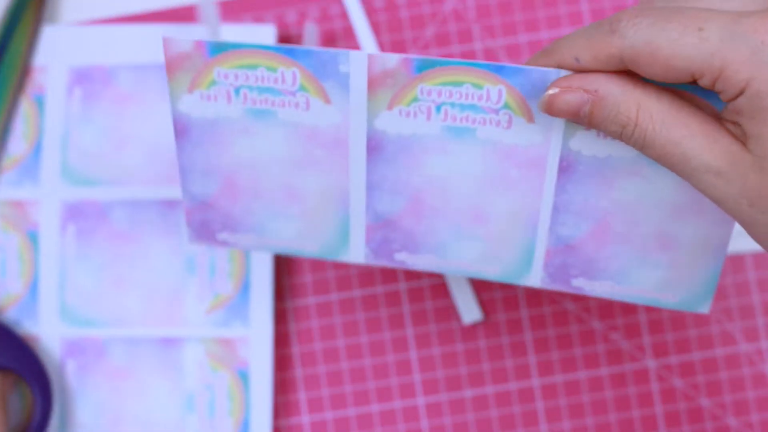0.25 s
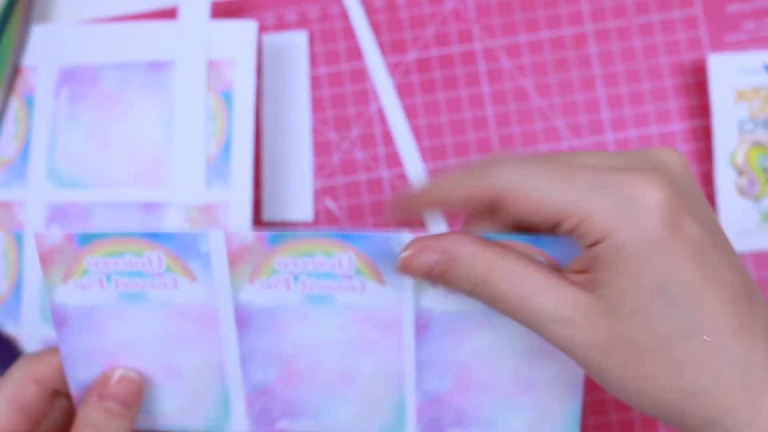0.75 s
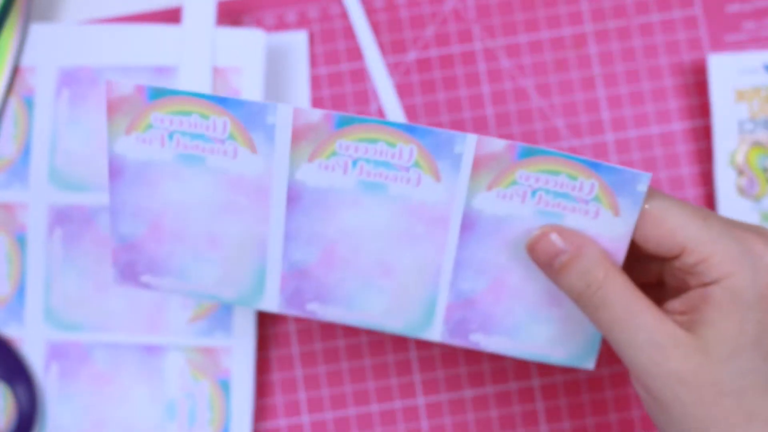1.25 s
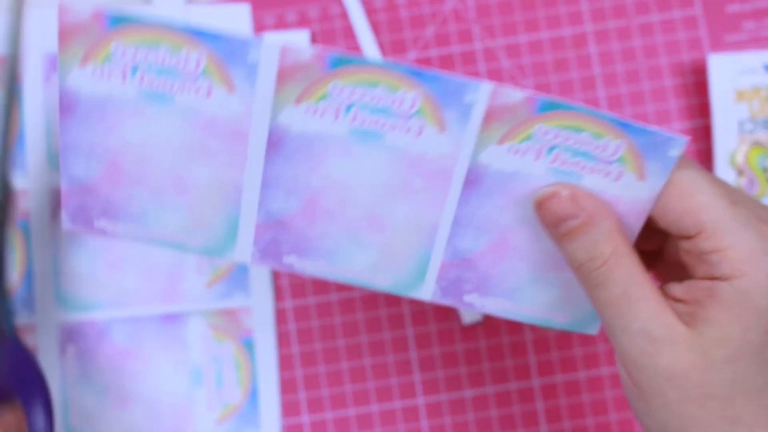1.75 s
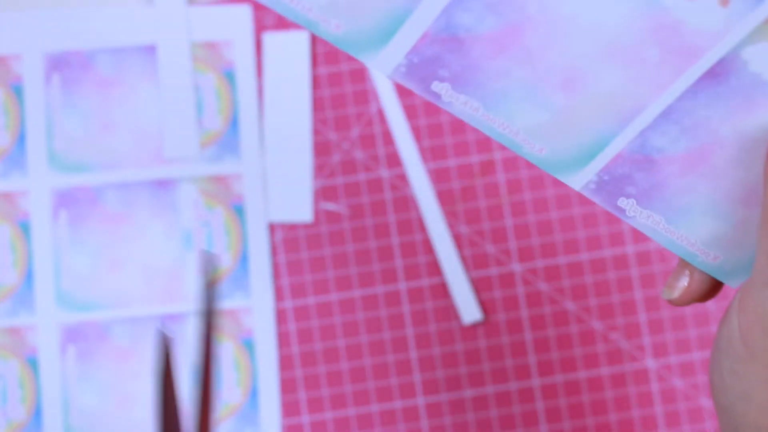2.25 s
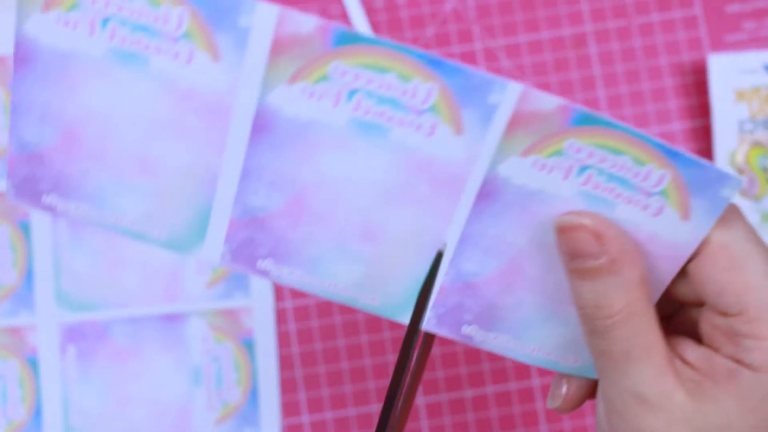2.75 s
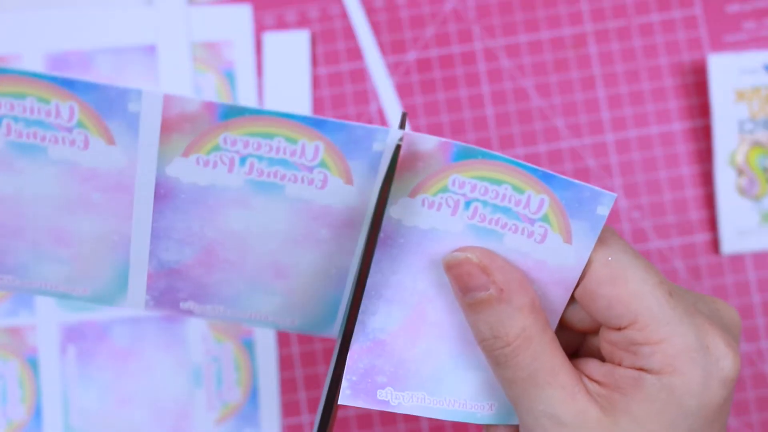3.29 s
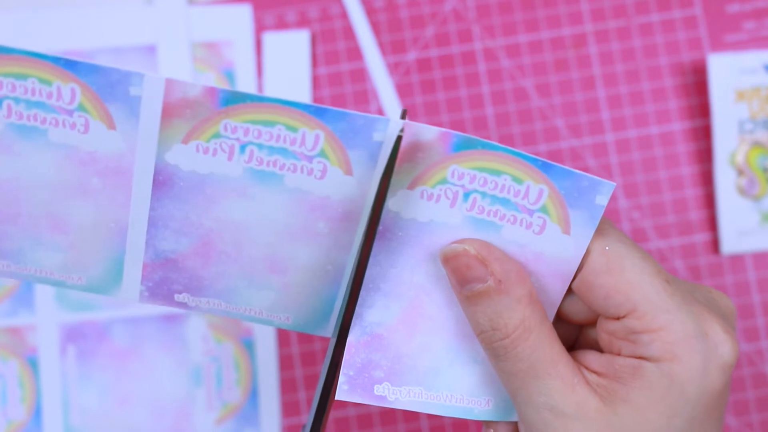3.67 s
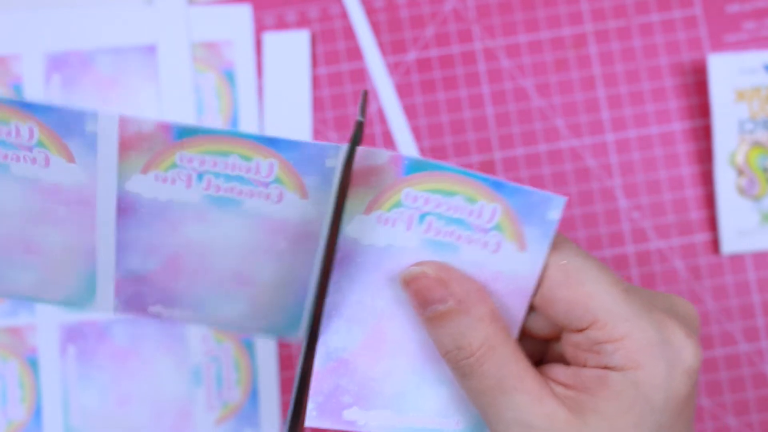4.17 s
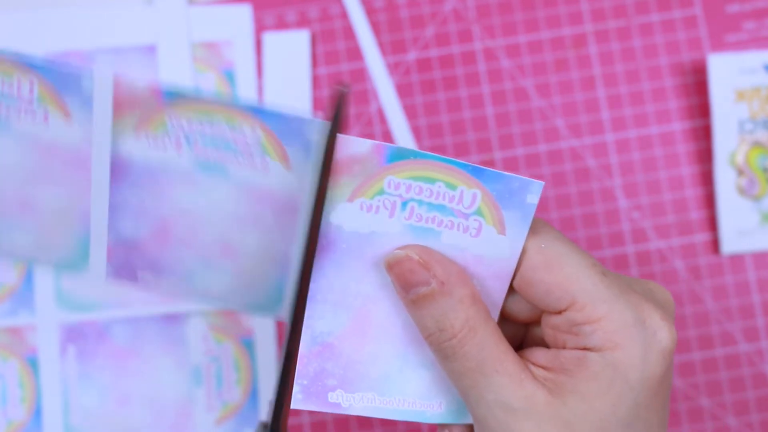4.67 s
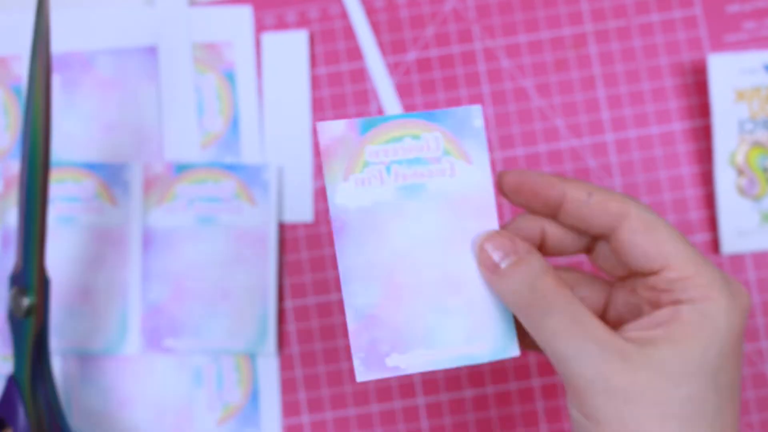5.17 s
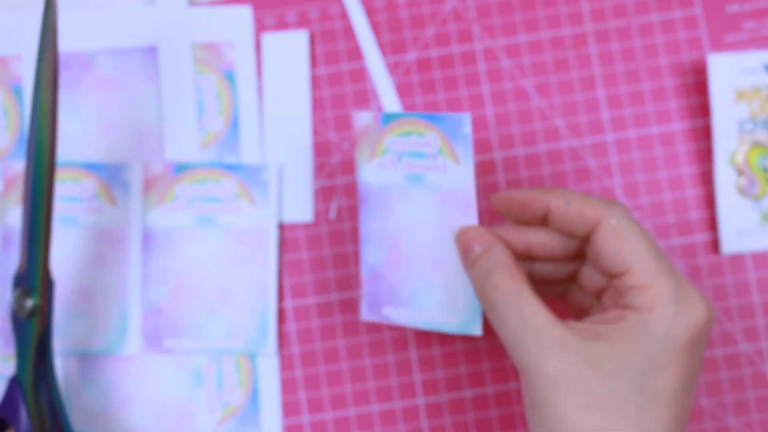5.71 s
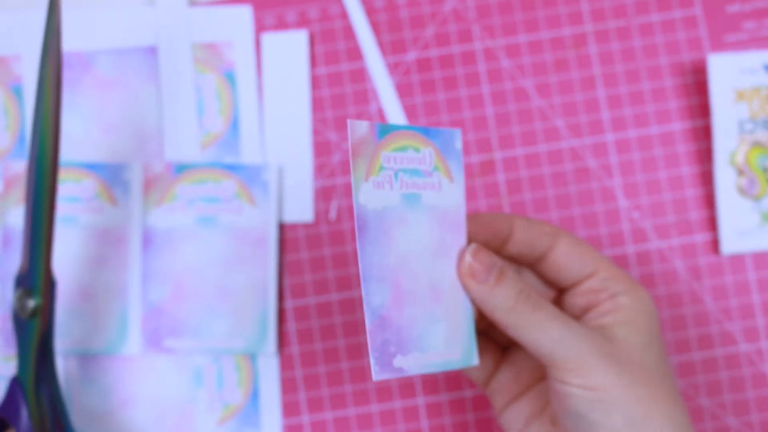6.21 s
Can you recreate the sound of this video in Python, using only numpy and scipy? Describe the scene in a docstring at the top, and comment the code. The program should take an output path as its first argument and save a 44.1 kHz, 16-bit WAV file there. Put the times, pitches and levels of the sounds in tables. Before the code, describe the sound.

Crisp irregular card flicks and dull knocks come first, thinning into small finger shifts. A thin metallic swish follows, then pivot ticks, stuttering blade scrapes and a short crackling cut. After a pause with tiny card rustles, more scraping and a second, slower creaky cut lead to a loud clacking snap. Handles settle on the table with a few taps, leaving only room hiss and faint rumble, closely miked and dry.

```python
"""A strip of printed card is slid and knocked about on a craft table, close by: filtered grains and rattles.
Scissors swish open and cut it in two pushes: catches of grains make the dry blades judder, and a stick-slip
sawtooth makes the card creak while puffs of grains crunch. The blades snap shut with decaying steel modes;
the scissors are laid down in taps of noise. A small room hisses, and a faint rumble sets in partway."""
import sys
import numpy as np
from scipy import signal
from scipy.fft import rfft, irfft
from scipy.io import wavfile

SR = 44100
rng = np.random.default_rng(int(sys.argv[2]) if len(sys.argv) > 2 else 0)


def store_wav(level_fs):
    """Save 16-bit WAV to argv[1]."""
    pcm = np.round(np.clip(np.atleast_2d(level_fs), -1, 1) * 32767)
    wavfile.write(sys.argv[1], SR, pcm.T.astype(np.int16))


N = 284445
TIME = np.arange(N) / SR

# Stiff card, broad colour. Each row: frequency in Hz, relative density in dB per Hz.
CARD_COLOUR = [(100, -14), (500, -15), (1050, 3.5), (2100, 1), (2800, 3.5), (3800, -3.5), (5800, -6),
               (7500, -18.5), (12000, -22), (15500, -50)]
# Stiff card, resonances. Each row: centre in Hz, width in Hz, height in dB on the colour's scale.
CARD_RESONANCES = [(1510, 190, 7.5), (2020, 160, 2.5)]


def from_db(db):
    """Amplitude factor of a level in dB."""
    return 10 ** (np.asarray(db) / 20)


def rms_one(x):
    """Scale to rms 1."""
    return x / np.sqrt(np.mean(x ** 2) + 1e-20)


def level(rows):
    """Gain over time from (s, dB) points; silent outside them."""
    return from_db(np.interp(TIME, *np.transpose(rows), left=-200, right=-200))


def add(track, s, sound):
    """Mix a short sound in at time s."""
    start = int(np.clip(round(s * SR), 0, N))
    track[start:start + len(sound)] += sound[:N - start]


def body(x, colour, peaks=(), size=8192):
    """Minimum-phase filter of unit energy: a broad colour plus resonances, falling away below the colour."""
    hz = np.maximum(np.arange(size // 2 + 1) * SR / size, 1)
    points = np.array(colour)
    colour_db = np.interp(np.log(hz), np.log(points[:, 0]), points[:, 1])
    power = from_db(colour_db) ** 2
    for centre, width, db in peaks:
        detuning = (hz ** 2 - centre ** 2) / (hz * width)
        power = power + from_db(db) ** 2 / (1 + detuning ** 2)
    power = power / (1 + (points[0, 0] / hz) ** 8) + 1e-10
    # folding the cepstrum makes the response causal
    cepstrum = irfft(np.log(power) / 2)
    cepstrum[1:size // 2] *= 2
    cepstrum[size // 2 + 1:] = 0
    response = irfft(np.exp(rfft(cepstrum)))
    return signal.oaconvolve(x, response / np.linalg.norm(response))[:N]


def drift(rate):
    """Slow chance: random knots of spread 1, rate per second, joined by lines."""
    knots = rng.standard_normal(N // 20)
    return np.interp(TIME * rate, np.arange(len(knots)), knots)


def grains(per_s, spread_db):
    """Random tiny slips of uneven size; rms 1."""
    size_db = spread_db * np.minimum(rng.exponential(1, N), 4)
    slips = from_db(size_db) * rng.choice([-1, 1], N)
    return rms_one(slips * (rng.random(N) < per_s / SR))


def contact(fade_s, size=8192):
    """A rattle of micro-contacts that dies away from rms 1."""
    envelope = np.exp(-TIME[:size] / max(fade_s, 1 / SR))
    rattle = rng.standard_normal(size) * envelope
    return rattle * np.linalg.norm(envelope) / np.linalg.norm(rattle)


def tail(x, t60, gap_s=0.0033):
    """Dense decaying reverberation of unit energy, swelling in over gap_s."""
    t = TIME[:SR // 2]
    envelope = np.exp(-np.log(1000) * t / t60) * (1 - np.exp(-t / gap_s))
    response = rng.standard_normal(len(t)) * envelope
    return signal.oaconvolve(x, response / np.linalg.norm(response))[:N]


def strokes(rows, column=2):
    """Gain over time of rubbing strokes, each with an attack, a hold and a release; powers add."""
    attack_s, release_s = 0.0088, 0.025
    power = np.zeros(N)
    for row in rows:
        t = TIME - row[0]
        attack = np.clip(t / attack_s, 0, 1)
        release = np.exp(-np.maximum(t - row[1], 0) / release_s)
        power += (from_db(row[column]) * attack * release) ** 2
    return np.sqrt(power)


def swell(top_s, hold_s, rise_db_per_s, fall_db_per_s):
    """Gain that climbs to 1 at top_s, holds and dies away."""
    before_s = np.maximum(top_s - TIME, 0)
    after_s = np.maximum(TIME - top_s - hold_s, 0)
    below_db = rise_db_per_s * before_s + fall_db_per_s * after_s
    return from_db(-np.minimum(below_db, 200))


def background(lumpy_db=3.0):
    """Steady filtered-noise hiss, a little of it opposite in the two ears, over a lumpy low rumble."""
    # Levels of hiss, rumble and side hiss. Each row: time in seconds, level in dB.
    hiss_levels = [(0, -46), (2.15, -48), (2.4, -46), (2.78, -47), (3.1, -49), (6.45, -50.5)]
    rumble_levels = [(2.81, -72), (2.84, -50.5), (5.42, -51.5), (5.5, -47), (6.45, -46)]
    side_levels = [(0, -68), (2.8, -61), (6.45, -59)]
    # Their broad colours. Each row: frequency in Hz, relative density in dB per Hz.
    hiss_colour = [(130, -2.5), (200, 1.5), (320, 3.5), (480, -2.5), (1000, -6.5), (1400, -6), (2000, -8.5),
                   (3400, -7), (5300, -6), (6400, -10.5), (8000, -16.5), (15500, -20)]
    rumble_colour = [(20, -1.5), (40, -4), (75, -3), (130, -10), (220, -18.5), (400, -42)]
    side_colour = [(35, -38), (60, -10), (159, 2.5), (1830, -5), (3190, -11.5), (3670, -10.5), (6560, -2),
                   (15500, -0.5)]
    hiss = level(hiss_levels) * body(rng.standard_normal(N), hiss_colour)
    lumps = from_db(lumpy_db * drift(rate=28))
    rumble = level(rumble_levels) * lumps * body(rng.standard_normal(N), rumble_colour)
    side = level(side_levels) * body(rng.standard_normal(N), side_colour)
    return hiss + rumble + side * np.array([[1], [-1]])


def card_sliding(hiss_db=-5, rub_db=-5.0, rasp_db=-8, rasp_width_hz=260, grit_db=-9.5, uneven_db=0.96):
    """Paper fibres brush past each other under an unsteady pressure; the card's edge catches and rasps."""
    # Strokes of card over card. Each row: start in seconds, time to release in seconds,
    # relative hiss in dB, relative dull rubbing in dB, nominal pitch of the edge's rasp in Hz.
    slides = [(0.0, 0.071, -29, -36, 4900), (0.077, 0.085, -29, -49, 3780), (0.169, 0.12, -34.5, -42, 5150),
              (0.253, 0.26, -35, -28.5, 3270), (0.35, 0.018, -24, -33, 4440),
              (0.58, 0.032, -41, -27.5, 4300), (0.788, 0.23, -45, -68, 5000),
              (0.986, 0.041, -39, -50, 4800), (1.281, 0.097, -45, -41.5, 3850),
              (1.487, 0.024, -26, -38, 3620), (1.508, 0.27, -35.5, -37.5, 3520),
              (1.567, 0.039, -27, -28.5, 4500), (1.797, 0.17, -44, -59, 5100)]
    # Broad colours. Each row: frequency in Hz, relative density in dB per Hz.
    hiss_colour = [(400, -30), (1500, -12.5), (2600, -3), (4200, -3), (6000, -1), (7400, -11), (9500, -16),
                   (12500, -19.5), (15500, -52)]
    rub_colour = [(60, -27), (170, -6), (330, -7.5), (700, -4), (1100, -5.5), (1550, 2), (2200, -4.5),
                  (4000, -46)]
    rasp_wander = 0.055   # log spread of the rasp's pitch

    pressure = from_db(uneven_db * drift(rate=120))
    speed = pressure * strokes(slides)
    hiss = from_db(hiss_db) * speed * grains(per_s=12000, spread_db=3.5)
    weight = pressure * strokes(slides, column=3)
    rub = from_db(rub_db) * weight * grains(per_s=1500, spread_db=4.0)
    # single catches ring the card
    grit = from_db(grit_db) * speed * grains(per_s=600, spread_db=1.5)

    low_pass = signal.butter(2, rasp_width_hz, fs=SR, output="sos")
    ringing = signal.sosfilt(low_pass, rng.standard_normal(N))
    travel = np.cumsum(np.exp(rasp_wander * drift(rate=25))) / SR
    rasp = np.zeros(N)
    for row in slides:
        tone = np.sin(2 * np.pi * row[-1] * travel)
        rasp += strokes([row]) * rms_one(ringing * tone)
    rubbing = body(hiss, hiss_colour) + body(rub, rub_colour)
    return rubbing + body(grit, CARD_COLOUR, CARD_RESONANCES) + from_db(rasp_db) * pressure * rasp


def all_flicks():
    """Strong flicks, and small uneven ones as the card shifts: (s, edge dB, rattle dB, body dB), relative."""
    # Card against table or blades. Each row: time in seconds, relative edge landing in dB,
    # relative rattle in dB.
    strong_flicks = [(0.243, -19, -21.5), (0.269, -10, -16.5), (0.275, -23, -19), (0.354, -11, -25.5),
                     (0.37, -0.5, -21.5), (0.42, -14, -17), (0.44, -11, -19), (0.452, -17, -24),
                     (0.467, 3.5, -17), (0.521, -16, -26), (0.587, -19, -25), (0.599, -22, -24.5),
                     (0.651, -25, -27.5), (0.78, -27, -42), (0.808, -12, -35.5), (1.328, -17, -34.5),
                     (1.487, -23, -28), (1.715, -33, -27), (1.745, -24, -19), (1.833, -23, -30),
                     (3.486, -40, -36.5), (3.544, -32, -38.5), (3.722, -29, -40), (3.767, -34, -40),
                     (4.116, -29, -24)]
    # The card shifts in the fingers. Each row: start in seconds, end in seconds,
    # relative rattle in dB, relative low body in dB.
    fidgets = [(0.673, 0.73, -37.5, -54), (0.991, 1.08, -44.5, -33.5), (1.281, 1.39, -41, -37),
               (1.759, 1.89, -38, -32.5), (3.418, 3.82, -47, -36)]
    flick_body_db, fidget_edge_db = -5.5, 1   # relative to the rattle
    fidgets_per_s, fidget_spread_db = 36, 2

    rows = [(s, edge_db, db, db + flick_body_db) for s, edge_db, db in strong_flicks]
    for start, end, db, low_db in fidgets:
        times = start + (np.arange(32) + rng.uniform(-.5, .5, size=32)) / fidgets_per_s
        chance_db = fidget_spread_db * rng.standard_normal(len(times))
        for s, d in zip(times, chance_db):
            if s < end:
                rows.append((s, db + d + fidget_edge_db, db + d, low_db + d))
    return rows


def card_handling(rattle_db=5.0, body_db=-8, hard_db=-3, edge_db=-2, thud_db=-2, flex_db=-1, sag=0.133,
                  spot_db=-4):
    """Flicks ring the card and tick its edge; knocks thud in the table and flex the sheet, whose pitch sags."""
    # Soft knocks of hand and card. Each row: time in seconds, relative level in dB,
    # fade constant in seconds, starting pitch of the flexing card in Hz.
    knocks = [(0.272, -33.5, 0.083, 292), (0.370, -19, 0.029, 273), (0.492, -18, 0.015, 456),
              (0.505, -18.5, 0.026, 334), (0.807, -32, 0.02, 317), (0.996, -40, 0.048, 306),
              (1.322, -32, 0.019, 338), (1.345, -42, 0.039, 103), (1.745, -37, 0.012, 221),
              (3.806, -35, 0.018, 311), (3.896, -23.5, 0.014, 422), (4.115, -20, 0.0046, 454),
              (4.939, -40.5, 0.058, 149)]
    # Broad colours of landing edge and table. Each row: frequency in Hz, relative density in dB per Hz.
    edge_colour = [(400, -3), (1200, 11), (3500, -6), (6000, 2), (7500, -5), (12000, -13), (15500, -38)]
    table_colour = [(60, -22), (110, -9), (160, -7.5), (290, 3.5), (480, 0), (750, -10), (1500, -17),
                    (5000, -77)]
    # Table resonances. Each row: centre in Hz, width in Hz, height in dB on the colour's scale.
    table_resonances = [(154.9, 7.5, 8.5), (374, 31, 0.39)]
    flick_fade_s, edge_lag_s = 0.0043, 0.000998   # the edge lands just after first touch
    bent_spot_hz, bent_spot_spread = 1580, 0.099   # median, log spread

    flicks, edges, thuds, flex = np.zeros((4, N))
    t = TIME[:SR // 3]
    for s, db, fade_s, hz in knocks:
        fade = np.exp(-t / fade_s)
        turns = np.cumsum(hz * (1 - sag * (1 - fade))) / SR
        onset = np.minimum(turns / 2, 1)
        add(flex, s, from_db(db + flex_db) * fade * onset * np.sin(2 * np.pi * turns))
        add(thuds, s, from_db(db + thud_db) * contact(fade_s))
    for s, landing_db, db, low_db in all_flicks():
        rattle = from_db(db + rattle_db) * contact(flick_fade_s)
        spot_hz = bent_spot_hz * np.exp(bent_spot_spread * rng.standard_normal())
        bent_spot = signal.lfilter(*signal.iirpeak(spot_hz, 4, fs=SR), rattle)
        add(flicks, s, from_db(-4.5) * rattle + from_db(spot_db) * bent_spot)
        add(edges, s + edge_lag_s, from_db([landing_db]))
        add(thuds, s, from_db(low_db + body_db) * contact(2 * flick_fade_s))
    card = body(flicks + from_db(hard_db) * edges, CARD_COLOUR, CARD_RESONANCES)
    ticks = from_db(edge_db) * body(edges, edge_colour)
    return card + ticks + body(thuds, table_colour, table_resonances) + flex


def blades(edge_s=0.0035, ring_db=-12, ring_t60=0.13, tick_db=-6, tick_fade_s=.004, glint_db=-10,
           glint_t60=0.12):
    """Steel scrapes on steel in short catches, and in one light swish as the scissors open; the pivot ticks."""
    # Dry blades catch on each other. Each row: time in seconds, relative level in dB.
    judders = [(2.84, -30.5), (2.868, -36), (2.921, -34), (2.935, -23.5), (2.961, -21), (2.97, -22.5),
               (2.992, -32), (3.016, -21), (3.779, -27), (3.838, -23), (3.868, -38), (3.895, -21),
               (3.923, -19.5), (4.655, -32.5), (4.682, -20.5), (4.69, -25), (4.722, -21), (4.739, -16.5)]
    # Light scraping between catches. Each row: start in seconds, time to release in seconds,
    # relative level in dB.
    closings = [(2.83, 0.16, -51.5), (3.83, 0.098, -43.5), (4.645, 0.068, -45.5)]
    # Open blades tick at the pivot. Each row: time in seconds, relative level in dB.
    pivot_ticks = [(2.5782, -44), (2.66, -41), (2.7343, -37.5)]
    # Broad colours of scrape and swish. Each row: frequency in Hz, relative density in dB per Hz.
    scrape_colour = [(100, -2), (450, -6), (1300, 2), (2000, -9.5), (6300, -5), (7400, -45), (9000, -27),
                     (11000, -26.5), (15500, -45)]
    swish_colour = [(1200, -13), (2200, -22), (3100, 0.5), (3900, -7), (5500, -0.5), (6400, -3),
                    (7900, -17), (8800, -11), (11400, -16), (15500, -25)]
    # Resonances. Each row: centre in Hz, width in Hz, height in dB on the colour's scale.
    blade_resonances = [(766, 120, -1), (1500, 130, 6), (2640, 130, 5.5), (3250, 220, -5), (4540, 86, -5),
                        (4770, 82, -3), (5890, 80, 6.5), (6170, 180, -7), (10300, 750, -11.5),
                        (11450, 160, -24)]
    swish_resonances = [(2220, 64, -5), (3100, 61, 2.5), (8800, 61, -2), (10000, 70, -6), (11200, 60, -13),
                        (11200, 72, -9)]
    pivot_resonances = [(7700, 120, 0), (8800, 120, 1)]
    catch_s, catch_colour_db = 0.0085, 2.5   # nominal length; spread of the brightness
    open_s, open_db, open_rise_db_per_s, open_fall_db_per_s = 2.246, -28.5, 533, 447

    grip, t = strokes(closings), TIME[:SR // 10]
    catch = np.minimum(t / edge_s, 1) * np.exp(-np.maximum(t + edge_s - catch_s, 0) / edge_s)
    for s, db in judders:
        add(grip, s, from_db(db) * catch)
    scrape = grip * grains(per_s=15000, spread_db=1.8)
    dull = signal.lfilter(*signal.butter(1, 2500, fs=SR), scrape)
    # the contact point travels along the edge
    bright = from_db(catch_colour_db * drift(rate=40))
    scrape = dull / bright + (scrape - dull) * bright
    # the blades' own resonances linger after each catch
    lingering = body(tail(scrape, ring_t60), [(400, 0), (6000, 10), (15500, -29)], blade_resonances)

    opening = swell(open_s, 0, open_rise_db_per_s, open_fall_db_per_s)
    swish = from_db(open_db) * opening * grains(per_s=6400, spread_db=0)
    # the free blades ring on
    glint = body(tail(swish, glint_t60), [(2000, -35), (15500, -38)], swish_resonances)
    ticks = np.zeros(N)
    for s, db in pivot_ticks:
        add(ticks, s, from_db(db + tick_db) * contact(tick_fade_s))
    scraping = body(scrape, scrape_colour, blade_resonances) + from_db(ring_db) * lingering
    swishing = body(swish, swish_colour, swish_resonances) + from_db(glint_db) * glint
    return scraping + swishing + body(ticks, [(4000, -22), (15500, -32)], pivot_resonances)


def cutting(crack_db=5, splinter_s=0.0042, clump_db=3.5):
    """The card sticks and slips in the jaws: strain builds and lets go, and each slip tears a puff of fibres."""
    # Pushes through the card. Each row: start in seconds, full force in seconds, hold in seconds,
    # build-up of the tearing in dB per second, relative creak in dB, relative crunch in dB,
    # relative fibre hiss in dB, log spread of the slip rate while the card holds.
    pushes = [(3.248, 3.296, 0.018, 794, -17, -17, -33.5, 0.01),
              (4.113, 4.215, 0.046, 88, -21.5, -24.5, -28, .55)]
    # Fibres giving way at once. Each row: time in seconds, relative click in dB,
    # relative splinters in dB, treble edge in Hz.
    cracks_rows = [(3.3079, -5, -13, 4300), (3.311, -1, -13.5, 3500), (3.3213, 1, -16.5, 2500),
                   (4.2098, -2, -14, 2400), (4.2155, -15, -17.5, 9000), (4.2227, -6, -8, 10000),
                   (4.2557, -1.5, -21, 3480), (4.2698, -8, -19.5, 12000)]
    # Broad colours. Each row: frequency in Hz, relative density in dB per Hz.
    creak_colour = [(60, -10), (200, -28), (450, -4.5), (900, -2.5), (1500, -9.5), (3000, -13), (9000, -37)]
    crunch_colour = [(150, -20), (700, 0), (2500, -12), (4000, -3.5), (6000, -16), (7500, -29),
                     (15500, -44)]
    hiss_colour = [(1500, -31), (4000, -3), (5900, 2.5), (7200, -7.5), (9000, -11), (11500, -8),
                   (15500, -31)]
    crack_colour = [(100, -9), (1000, 1), (4000, -0.5), (6500, -4.5), (8500, -12.5), (15500, -10)]
    # Resonances. Each row: centre in Hz, width in Hz, height in dB on the colour's scale.
    held_card_resonances = [(121, 39, 0), (276, 34, 0.5), (412, 53, 5.5), (555, 29, 4)]
    crunch_resonances = [(840, 82, 7.5), (1054, 88, 5.5), (1590, 130, 8), (2136, 52, 5.5), (2590, 160, 9),
                         (3060, 120, 6), (3600, 170, 5), (4340, 78, -1)]
    let_go_db_per_s, crunch_lag_s = 347, 0.002
    creak_steeper = 2.03   # creak's build-up rate relative to the tearing's
    # once the card yields, the slips slow down and their unevenness moves to loose_uneven
    grip_slips_per_s, loose_slips_per_s, loose_uneven = 280, 122, .4
    yield_after_s, yield_s = .008, .028

    strain, tearing, hiss, cracks = np.zeros((4, N))
    for start, full_s, hold_s, build_db_per_s, creak_db, crunch_db, hiss_db, uneven in pushes:
        pushing = TIME > start
        force = pushing * swell(full_s, hold_s, creak_steeper * build_db_per_s, let_go_db_per_s)
        tear = pushing * swell(full_s + crunch_lag_s, hold_s, build_db_per_s, let_go_db_per_s)
        # 1 while the card holds, then towards 0
        held = np.exp(-np.maximum(TIME - full_s - yield_after_s, 0) / yield_s)
        jitter = held * uneven + (1 - held) * loose_uneven
        mean_rate = held * grip_slips_per_s + (1 - held) * loose_slips_per_s
        rate = mean_rate * np.exp(jitter * drift(rate=430))
        since_slip = np.cumsum(rate * pushing) / SR % 1   # in slip periods
        # fibres lie in clumps
        puffs = rms_one(np.exp(-1.0 * since_slip) * from_db(clump_db * drift(rate=160)))
        creak = body(since_slip - .5, creak_colour, held_card_resonances)
        creak_rms = np.sqrt(np.average(creak ** 2, weights=force ** 2))
        strain += from_db(creak_db) * force * creak / creak_rms
        tearing += from_db(crunch_db) * tear * puffs * grains(per_s=4000, spread_db=2.5)
        hiss += from_db(hiss_db) * tear * puffs * grains(per_s=7800, spread_db=3.5)
    for s, db, splinter_db, edge_hz in cracks_rows:
        crack = from_db(splinter_db) * contact(splinter_s)
        crack[0] += from_db(db + crack_db)
        low_pass = signal.butter(2, min(edge_hz, SR / 2 - 1), fs=SR, output="sos")
        add(cracks, s, signal.sosfilt(low_pass, crack))
    torn = body(tearing, crunch_colour, crunch_resonances) + body(hiss, hiss_colour)
    return strain + torn + body(cracks, crack_colour)


def snap_shut(modes_db=-39, shimmer_db=-23.5, shimmer_fade_s=0.046):
    """The handles clack together; the steel rings on in clear sine modes and a noisy shimmer of faint ones."""
    # Clear modes of the shut steel. Each row: frequency in Hz, relative level in dB.
    steel_modes = [(2735, 2), (2820, 4), (2907, 0), (4825, -1), (4996, 2), (5305, -11), (5460, 6),
                   (5550, 1), (6035, -5)]
    # Broad colours of clack and shimmer. Each row: frequency in Hz, relative density in dB per Hz.
    clack_colour = [(200, -9), (700, -18.5), (1300, 3), (3600, 3), (6300, 1), (7400, -19), (10500, -9),
                    (15500, -21)]
    shimmer_colour = [(700, -41), (1500, -13), (2900, 2.5), (4000, -6), (5000, 2.5), (6300, 1.5),
                      (7600, -13), (10000, -26), (15500, -35)]
    snap_s, snap_db, snap_fade_s, steel_t60_s = 4.7446, 3.5, .0014, .24

    clack, shimmer, ring = np.zeros((3, N))
    add(clack, snap_s, from_db(snap_db) * contact(snap_fade_s))
    add(shimmer, snap_s, from_db(shimmer_db) * contact(shimmer_fade_s))
    t = TIME[:SR // 2]
    decay = np.exp(-np.log(1000) * t / steel_t60_s)
    for hz, db in steel_modes:
        add(ring, snap_s, from_db(modes_db + db) * np.sin(2 * np.pi * hz * t) * decay)
    return body(clack, clack_colour) + body(shimmer, shimmer_colour) + ring


def putting_down():
    """The hollow plastic handles tap and settle as resonant rattles; fingers brush the paper in grains."""
    # Handles tapping. Each row: time in seconds, relative level in dB, fade constant in seconds.
    handle_taps = [(4.923, -36.5, 0.0016), (4.935, -21, 0.0085), (4.948, -42, 0.01), (4.962, -32.5, 0.014),
                   (4.998, -42, 0.022)]
    # Fingers leaving the handles. Each row: start in seconds, time to release in seconds,
    # relative level in dB.
    brushes = [(4.935, 0.017, -40), (4.98, 0.2, -51), (5.185, 0.014, -47.5)]
    # Handle colour. Each row: frequency in Hz, relative density in dB per Hz.
    handle_colour = [(100, 8), (600, -16), (1500, 7.5), (3000, -4.5), (6000, -8), (7500, -18), (12000, -14),
                     (15500, -30)]
    # Handle resonances. Each row: centre in Hz, width in Hz, height in dB on the colour's scale.
    handle_resonances = [(1464, 91, 18.5), (2020, 240, 1)]
    brush_colour = [(1500, -4.5), (5500, 2.5), (7500, -4.5), (12500, -6), (15500, -17)]

    taps = np.zeros(N)
    for s, db, fade_s in handle_taps:
        add(taps, s, from_db(db) * contact(fade_s))
    brush = strokes(brushes) * grains(per_s=6000, spread_db=3.5)
    return body(taps, handle_colour, handle_resonances) + body(brush, brush_colour)


def scene(room_db=-17, room_t60=0.2):
    """Everything happens straight ahead, close by, in a small dry room."""
    floor = background()
    near = card_sliding() + card_handling() + blades() + cutting() + snap_shut() + putting_down()
    return near + from_db(room_db) * tail(near, room_t60) + floor


def record(dry):
    """Peaks overload and clip; a steep low-pass cuts the top."""
    cutoff_hz = 15800
    clipped = np.clip(dry, -.9, .9)
    low_pass = signal.ellip(10, .1, 70, cutoff_hz, fs=SR, output="sos")
    return signal.sosfilt(low_pass, clipped)


dry = scene()
out = record(dry)
store_wav(out)
```